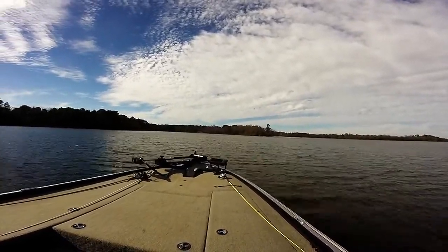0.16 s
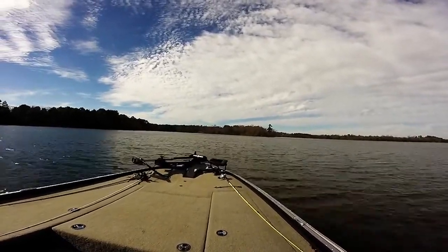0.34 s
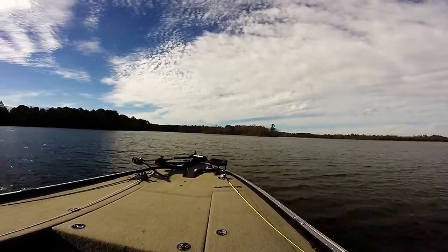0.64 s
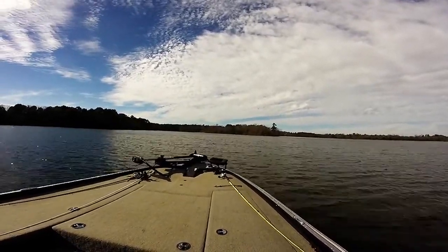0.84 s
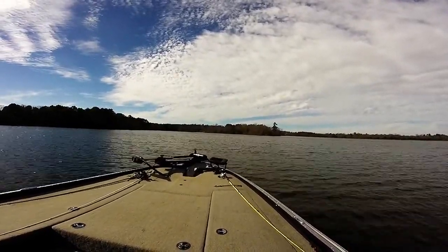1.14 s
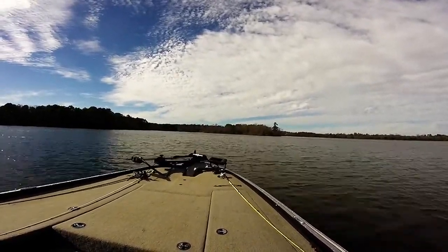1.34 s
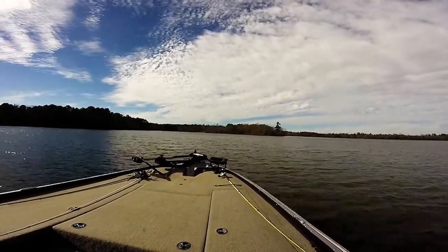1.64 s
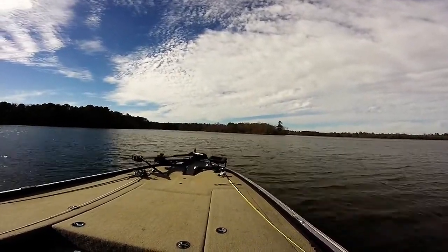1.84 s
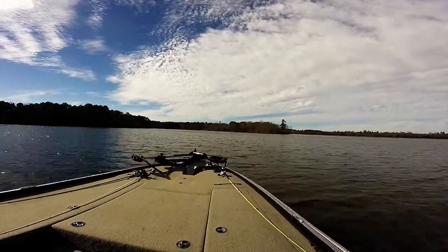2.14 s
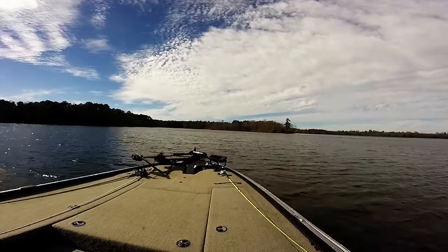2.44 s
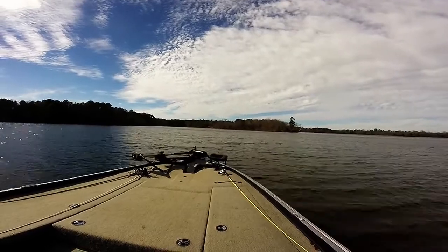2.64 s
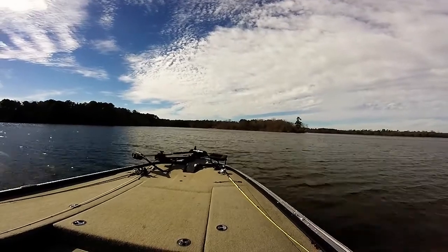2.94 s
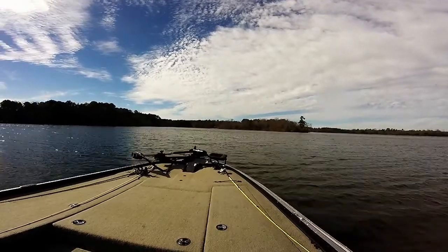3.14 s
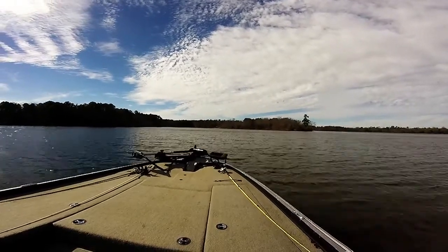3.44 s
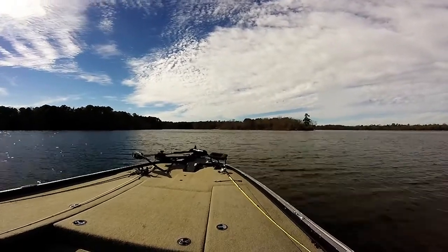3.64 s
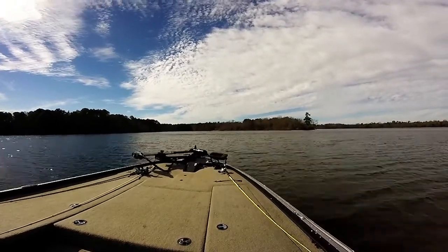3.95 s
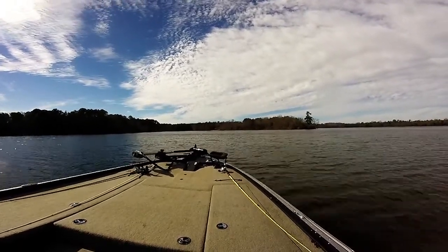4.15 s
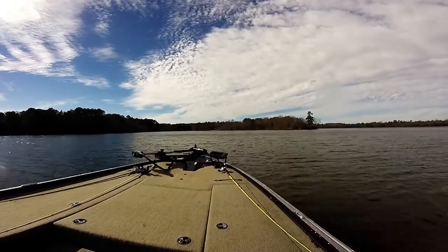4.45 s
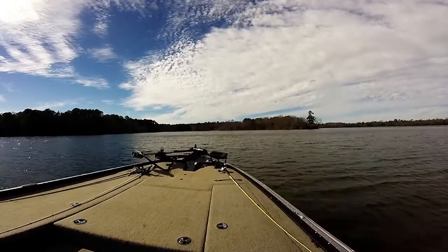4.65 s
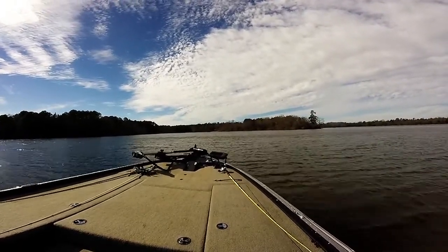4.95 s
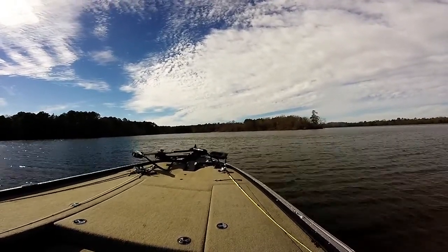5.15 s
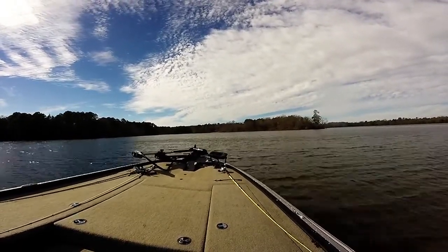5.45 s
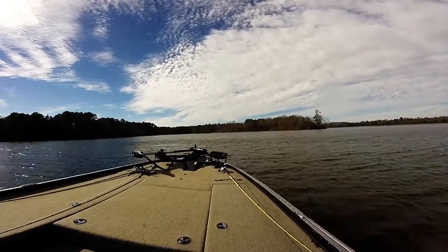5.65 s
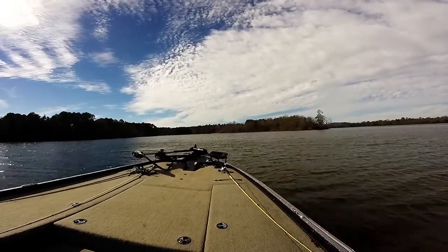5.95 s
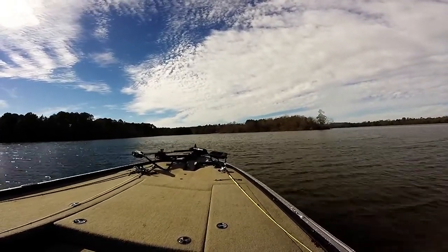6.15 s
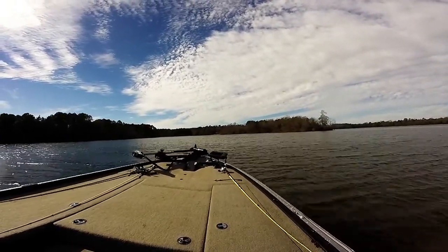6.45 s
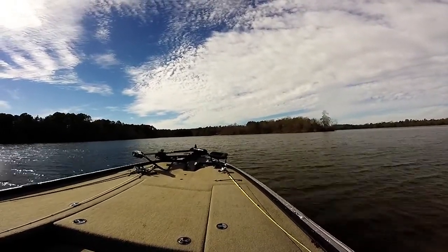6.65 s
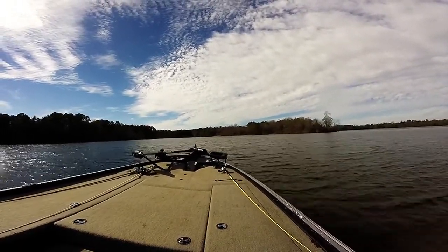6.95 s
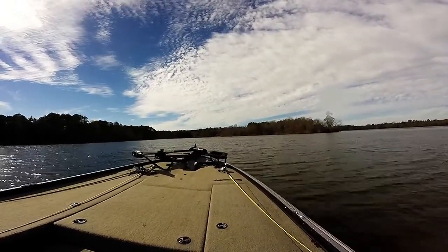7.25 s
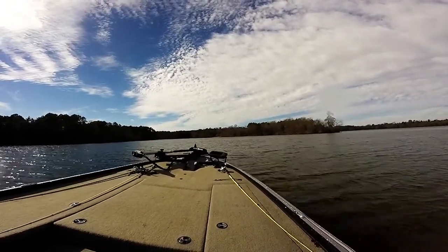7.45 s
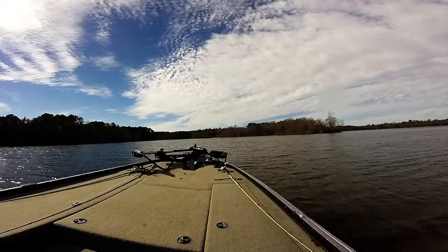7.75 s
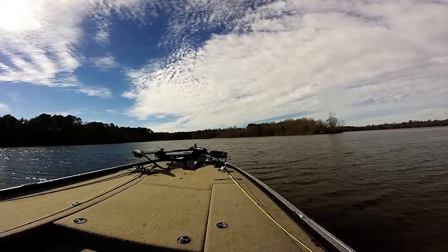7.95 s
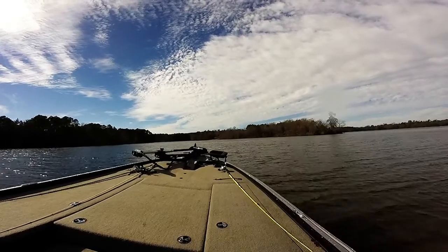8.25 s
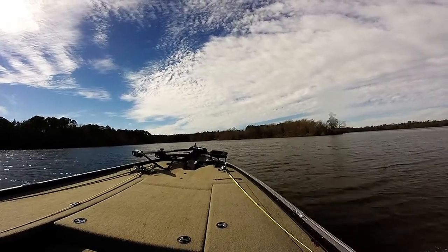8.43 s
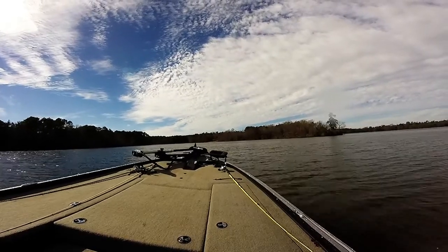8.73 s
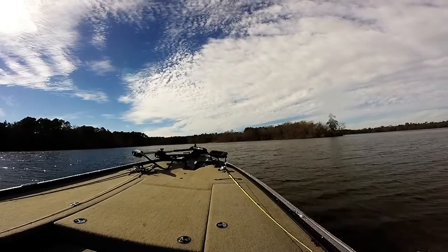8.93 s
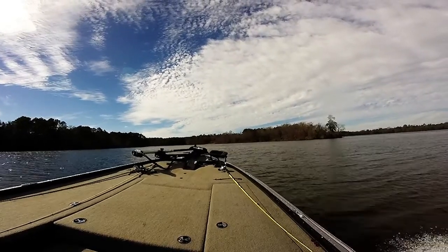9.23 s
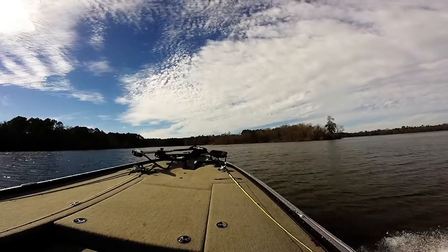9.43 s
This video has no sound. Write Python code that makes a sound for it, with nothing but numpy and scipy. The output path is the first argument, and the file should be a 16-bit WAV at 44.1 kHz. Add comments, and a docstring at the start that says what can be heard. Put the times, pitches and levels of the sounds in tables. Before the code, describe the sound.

An outboard drones steadily with rattling fittings, then throttles down through a hull boom into gusty wind rumble, wave thuds, rushing water and late splashes.

```python
"""A fishing boat runs across a lake, heard from a camera in a plastic housing on its deck.
At first the outboard drones at speed, made of sine tones, and buzzes and knocks loose fittings (noise).
Wind and chop rumble in gusts throughout, and water rushes along the sides: all of it shaped noise.
From about 1.2 s the throttle is eased and the tones sweep down through a boom of the hull.
Then waves boom, wavelets slap as short ringing tones, and near the end spray splashes beside the bow."""
import sys
import numpy as np
from scipy import signal
from scipy.fft import rfft, irfft, next_fast_len
from scipy.io import wavfile
from scipy.ndimage import uniform_filter1d, minimum_filter1d, map_coordinates

SR = 44100
rng = np.random.default_rng(int(sys.argv[2]) if len(sys.argv) > 2 else 0)


def wav_out(sig):
    """Save sig, one row per channel (or a flat mono array), as 16-bit PCM at SR to the path in sys.argv[1]."""
    wavfile.write(sys.argv[1], SR, np.round(np.clip(np.atleast_2d(sig).T, -1, 1) * 32767).astype(np.int16))


N = 422918  # length in samples

# Engine speed. Each row: time in seconds, crankshaft turns per second.
THROTTLE = [(0, 84.3), (.6, 84.4), (1.15, 84), (1.35, 80.5), (1.5, 72.5), (1.7, 67), (1.95, 58), (2.33, 50),
            (2.57, 48.4), (2.75, 46.5), (3.1, 44.7), (9.59, 44)]
# Engine loudness. Each row: time in seconds, gain in dB.
ENGINE_LOAD = [(0, -.5), (.6, 0), (1.2, -.5), (1.35, .5), (1.5, -1), (1.7, -8), (2.28, -11), (2.36, -1),
               (2.58, 0), (2.63, -9), (3.1, -9), (3.5, -15), (9.59, -18)]
# Engine tones. Each row: multiple of the crankshaft rate, level in dB before load and hull.
# The multiple 1.72 is the beat of the geared-down propeller blades.
ENGINE_TONES = [(1, -23.2), (1.72, -21.3), (2, -26), (3, -31.5), (4, -33.5), (5, -33)]
BOOM_HZ, BOOM_WIDTH_HZ, BOOM_DB = 85, 15, 12  # the hull's main resonance

# Resonances and dips of deck and mount. Each row: centre in Hz, width in Hz, gain in dB.
DECK = [(58.8, 7.7, 7), (68.4, 9, -10), (87.5, 6.1, 5.5), (118, 8.7, 5), (124.4, 4.2, -5.5),
        (140.5, 11.6, 3.5), (163.7, 10.2, 4.5), (175, 8.3, -5), (204.8, 11.8, 6), (440, 18, 5)]
# Resonances and dips of the plastic housing. Each row: centre in Hz, width in Hz, gain in dB.
HOUSING = [(641, 40, 4.5), (752, 118, 5), (1921, 167, 8.5), (2540, 570, 11), (3040, 108, -7.5),
           (3454, 420, 10.5), (3867, 133, -15), (3977, 360, 8.5), (4850, 350, 6), (5085, 145, -14),
           (6416, 930, 14.5), (8380, 330, 7.5), (10610, 690, 11)]

# Every spectrum below gives a shape only; its sound is scaled to an even level afterwards.
# Buzz of loose fittings. Each row: frequency in Hz, relative level in dB.
BUZZ_SPECTRUM = [(250, -42), (500, 3), (650, 5.5), (1000, 0), (1600, -4), (2100, 2), (2600, -11.5),
                 (4000, -17.5), (7000, -50), (14000, -96)]

# Strength of the wind. Each row: time in seconds, upper buffet in dB, low buffet in dB, before gains.
WIND = [(0, -24, -36), (1.2, -25, -34), (1.6, -21, -33), (1.9, -22, -28), (2.3, -17, -28), (2.65, -21, -29),
        (3.4, -18.5, -30), (4.0, -15.5, -26), (4.4, -18.5, -26.5), (5.1, -16.5, -23.5), (5.6, -16, -27),
        (6.2, -17.5, -32), (7.5, -13.5, -27.5), (7.85, -17.5, -36.5), (8.7, -16.5, -29.5),
        (9.1, -19.5, -34), (9.59, -20.5, -40)]
# The strongest gusts. Each row: time of the peak in seconds, rise in dB.
GUSTS = [(1.14, 5), (2.35, 2.5), (4.97, 5.5), (5.22, 3), (5.88, 5.5), (6.37, 2.5), (7.1, 1), (7.6, 1.5),
         (8.77, 2.5)]
GUST_S = .12  # length of a gust in seconds, at half its rise
HIGH_BUFFET_GAIN_DB = 0.86
HIGH_FLUTTER_DB, LOW_FLUTTER_DB = 1.62, 2.5  # depth of each layer's random flutter
# Low wind rumble. Each row: frequency in Hz, relative level in dB.
LOW_BUFFET_SPECTRUM = [(8, -17), (22, -10.5), (35, -2), (52, 0), (68, 6.5), (90, -7), (160, -42),
                       (400, -97)]
# Upper wind rumble. Each row: frequency in Hz, relative level in dB.
HIGH_BUFFET_SPECTRUM = [(40, -46), (75, -11), (100, -2.5), (150, 2), (200, -4), (260, -13), (305, -24),
                        (400, -34), (600, -48), (2000, -76)]

# The hull rides over waves. Each row: time of the peak in seconds, length in seconds, level in dB
# before the gain.
WAVES = [(1.977, 0.097, -12.5), (3.017, 0.18, -18), (3.26, 0.11, -13.5), (3.757, 0.24, -19.5),
         (4.277, 0.33, -15), (4.66, 0.19, -21), (4.947, 0.15, -13.5), (5.38, 0.16, -21),
         (5.664, 0.085, -12), (6.197, 0.18, -14.5), (6.623, 0.087, -15.5), (6.876, 0.14, -15.5),
         (7.555, 0.25, -13.5), (8.518, 0.24, -18.5), (9.22, 0.46, -18)]
WAVE_GAIN_DB = -3
CHOP_DB = 2.5  # steady boom, relative to the low buffet
# The hull's boom. Each row: frequency in Hz, relative level in dB.
BOOM_SPECTRUM = [(40, -38), (70, -18.5), (86, 3.5), (104, -16.5), (160, -50.5), (400, -94)]

# Strength of the bow wave. Each row: time in seconds, spray in dB, fizz in dB, before gains.
BOW_WAVE = [(0.0, -40, -45.5), (1.35, -39.5, -47), (2.2, -32.0, -39), (2.65, -36, -44), (3.1, -33.5, -40.5),
            (3.5, -34.5, -43), (3.9, -31.5, -36.5), (4.4, -34, -45), (5.3, -31, -41.5), (5.5, -37, -49),
            (5.85, -34.5, -43), (6.03, -36.5, -51), (6.6, -34.5, -42), (7.3, -33.5, -48.5),
            (7.7, -39, -58.5), (8.35, -37.5, -53), (8.9, -40.5, -54.5), (9.59, -44.5, -56.5)]
SPRAY_GAIN_DB, FIZZ_GAIN_DB = -.5, 0.07
WASH_DB, WASH_FOLLOWS = -38.5, 0.6  # mean of the wash's level curve; its dB per dB of fizz
# The bow wave curls into a hissing sheet as the boat settles. Each row: time in seconds, level in dB.
SHEET = [(0, -67), (2, -57), (3.4, -42), (4.2, -39.5), (5.3, -38.5), (6, -42), (6.6, -37.5), (7.2, -40.5),
         (7.6, -48), (8.3, -67), (9.59, -70)]
# Wash along the sides. Each row: frequency in Hz, relative level in dB.
WASH_SPECTRUM = [(150, 1), (400, 1.5), (700, -2.5), (1100, -0.5), (1700, -1.5), (2400, -5.5), (4000, -39),
                 (12000, -65)]
# Spray. Each row: frequency in Hz, relative level in dB.
SPRAY_SPECTRUM = [(800, -25), (1800, -14.5), (2600, 3), (3400, 1.5), (4300, -9), (5500, -24), (8000, -52),
                  (15000, -75)]
# Fizz of fine drops. Each row: frequency in Hz, relative level in dB.
FIZZ_SPECTRUM = [(2500, -21.5), (4500, 5.5), (5600, -0.5), (7000, 0.5), (9000, 0.5), (10000, -10),
                 (12000, -15), (15000, -38)]
# Hiss of the sheet. Each row: frequency in Hz, relative level in dB.
SHEET_SPECTRUM = [(2500, -17), (3600, 5.5), (4200, 7.5), (4900, 2.5), (5800, -3.5), (8000, -18),
                  (15000, -75)]

# Loose fittings knock. Each row: start in seconds, level in dB before the gain.
KNOCKS = [(0.177, -23), (0.381, -22), (0.395, -23), (0.9043, -23), (0.915, -20.5), (0.973, -22),
          (1.1444, -24), (1.2475, -22), (1.3003, -17), (1.945, -14), (1.965, -14)]
# A knock. Each row: frequency in Hz, relative level in dB.
KNOCK_SPECTRUM = [(300, -33), (650, -9), (1400, 2), (2100, 1), (2700, -0.5), (4000, -27), (7000, -53),
                  (14000, -90)]

# The hull meets wavelets. Each row: start in seconds, level in dB before the gain, pitch in Hz.
SLAPS = [(3.292, -6, 171.5), (5.075, -2.5, 163), (5.422, -1.5, 162.5), (5.951, -7, 153), (6.16, -12, 158),
         (7.886, -8.5, 202.5), (8.104, -2.5, 203)]

# Fine mist beside the bow. Each row: time in seconds, level in dB.
MIST = [(0, -93.5), (7.7, -88), (8.4, -57.5), (9.1, -56), (9.59, -54.5)]
# Mist. Each row: frequency in Hz, relative level in dB.
MIST_SPECTRUM = [(3000, -24), (5500, 4.5), (9000, -2.5), (11000, -9.5), (12300, -12), (13400, -10),
                 (15000, -21)]
# Sheets of water land. Each row: start in seconds, level in dB before the gain, pitch in Hz.
SPLASHES = [(7.72, -32, 3450), (7.88, -29, 3450), (8.0, -32, 3400), (8.24, -27.5, 3450),
            (8.33, -26.5, 2550), (8.46, -31, 2450), (8.72, -27.5, 2900), (8.86, -25.5, 3380),
            (9.22, -25.5, 2620), (9.40, -34, 2450), (9.49, -28, 2600)]
SPLASH_SKIRT_DB = 56  # fall of a splash's spectrum one octave from its pitch

TOP_HZ = 15140  # nothing is kept from here up


def amp(db):
    """Turn decibels into a gain."""
    return 10 ** (np.asarray(db) / 20)


def unit(x):
    """Scale to an average strength (rms) of 1."""
    return x / np.sqrt(np.mean(x ** 2) + 1e-20)


def along(points, hz):
    """Read a spectrum's level at any frequency, on a log frequency axis."""
    f, v = np.transpose(points)
    return np.interp(np.log(hz + 1), np.log(f + 1), v)


def bumps(modes, hz):
    """Add up the dB of bell-shaped peaks and dips; each width is taken at half its dB."""
    return sum(db * np.exp2(-(2 * (hz - centre) / width) ** 2) for centre, width, db in modes)


def curves(rows):
    """Draw one smooth-running line per column after the time, with a value for every sample."""
    s, *cols = np.transpose(rows)
    return [np.interp(np.arange(N) / SR, s, c) for c in cols]


def wobble(rate):
    """A smooth random curve through rate random points a second."""
    points = rng.standard_normal(int(N * rate / SR) + 4)
    return map_coordinates(points, [np.arange(N) * rate / SR])


def swell(s, length):
    """A smooth rise and fall from 0 to 1 around time s, length seconds wide at half height."""
    return np.exp2(-(2 * (np.arange(N) / SR - s) / length) ** 2)


def filtered(x, response):
    """Weigh each frequency of x by a response."""
    size = next_fast_len(N + SR // 2)  # spare room so that the end does not wrap round
    spectrum = rfft(x, size) * response(np.fft.rfftfreq(size, 1 / SR))
    return irfft(spectrum, size)[:N]


def coloured(x, spectrum, modes):
    """Give x a broad spectrum and a body's resonances, at rms 1."""
    return unit(filtered(x, lambda hz: amp(along(spectrum, hz) + bumps(modes, hz))))


def drops(rate, spread_db):
    """Random impacts, about rate a second, whose sizes vary by spread_db, at rms 1."""
    hit = rng.random(N) < rate / SR
    size_db = spread_db * np.clip(rng.standard_normal(N), -2, 2)
    return unit(hit * rng.standard_normal(N) * amp(size_db))


def bursts(events, spectrum, attack, t60):
    """Short puffs of noise coloured by the housing; each falls 60 dB in t60 seconds."""
    t = np.arange(N) / SR
    blows = np.zeros(N)
    for s, db in events:
        start = round(s * SR)
        age = t[:N - start]
        blows[start:] += amp(db - 60 * age / t60) * (1 - np.exp(-age / attack))
    return blows * coloured(rng.standard_normal(N), spectrum, HOUSING)


def outboard(speed, turns, shake):
    """Shaft and propeller tones swell as they cross the hull's boom; throttled back, firing is uneven."""
    level_db, = curves(ENGINE_LOAD)
    uneven = 1 + 2.5 * (1 - shake)
    drone = np.zeros(N)
    for multiple, db in ENGINE_TONES:
        hz = multiple * speed
        # octaves outside the band that the hull passes on, 62 to 255 Hz
        outside = np.log2(np.maximum(hz / 255, 1)) + np.log2(np.maximum(62 / hz, 1))
        hull_db = bumps([(BOOM_HZ, BOOM_WIDTH_HZ, BOOM_DB)], hz) - 42 * outside
        phase = 2 * np.pi * multiple * turns + .04 * uneven * wobble(25)
        tone_db = db + hull_db + .35 * uneven * wobble(18)
        drone += amp(tone_db) * np.sqrt(2) * np.sin(phase)
    return amp(level_db) * drone


def fittings(shake, turns):
    """Loose parts buzz once a turn, in fits, while the engine shakes them."""
    contact = np.exp(1.7 * np.cos(2 * np.pi * turns))  # strongest once every turn
    fits = amp(4.1 * wobble(14.1))
    buzz = coloured(contact * fits * rng.standard_normal(N), BUZZ_SPECTRUM, HOUSING)
    return amp(-40) * shake * buzz


def buffet(spectrum, evenness):
    """Turbulence makes the deck ring; evenness (0 to 1) tames its chance swells."""
    x = coloured(rng.standard_normal(N), spectrum, DECK)
    power = np.abs(uniform_filter1d(x ** 2, size=SR // 10)) + 1e-6  # averaged over 0.1 s
    return unit(x / power ** (np.clip(evenness, 0, 1) / 2))


def wind():
    """Wind rumbles in deck and mount; gusts push the upper buffet, and both layers flutter by chance."""
    high_db, low_db = curves(WIND)
    gust_db = sum(db * swell(s, GUST_S) for s, db in GUSTS)
    low_db = low_db + LOW_FLUTTER_DB * wobble(8)
    high_db = high_db + HIGH_BUFFET_GAIN_DB + gust_db + HIGH_FLUTTER_DB * wobble(11)
    low = amp(low_db) * buffet(LOW_BUFFET_SPECTRUM, evenness=0.55)
    high = amp(high_db) * buffet(HIGH_BUFFET_SPECTRUM, evenness=0.59)
    return low + high


def hull():
    """The hull booms faintly with the low rumble and swells as it rides over each wave."""
    _, low_db = curves(WIND)
    waves = sum(amp(db) * swell(s, length) for s, length, db in WAVES)
    strength = amp(low_db + CHOP_DB) + amp(WAVE_GAIN_DB) * waves
    return strength * buffet(BOOM_SPECTRUM, evenness=0.99)


def water(shake):
    """The bow wave washes, sprays, falls back as fine drops and hisses; wash follows fizz, less steeply."""
    spray_db, fizz_db = curves(BOW_WAVE)
    wash_db = WASH_DB + WASH_FOLLOWS * (fizz_db - fizz_db.mean())
    sheet_db, = curves(SHEET)
    surge_db = 0.27 * wobble(6) + 0.2 * wobble(19) + 0.66 * wobble(60)

    # each layer but the sheet mixes steady noise with separate drops
    wash_source = rng.standard_normal(N) + .5 * drops(rate=500, spread_db=2.5)
    spray_source = rng.standard_normal(N) + 0.6 * drops(rate=1100, spread_db=4)
    fizz_source = rng.standard_normal(N) + .5 * drops(rate=3200, spread_db=11.0)
    wash = coloured(wash_source, WASH_SPECTRUM, HOUSING)
    spray = coloured(spray_source, SPRAY_SPECTRUM, HOUSING)
    fizz = coloured(fizz_source, FIZZ_SPECTRUM, HOUSING)
    sheet = coloured(rng.standard_normal(N), SHEET_SPECTRUM, HOUSING)

    # thin spray arrives in separate spurts
    spurts_db = np.clip((-33 - spray_db) / 5.6, .5, 1.6) * wobble(18)
    spray_db = spray_db + SPRAY_GAIN_DB - 1.6 * shake + spurts_db
    near = amp(wash_db) * wash + amp(spray_db) * spray
    fine = amp(fizz_db + FIZZ_GAIN_DB) * fizz + amp(sheet_db) * sheet
    return amp(surge_db) * (near + fine)


def knocks():
    """Loose fittings strike harder now and then: very short bursts of noise."""
    return amp(-3) * bursts(KNOCKS, KNOCK_SPECTRUM, attack=.0007, t60=.026)


def slaps():
    """Wavelets thump the hull, which rings at one pitch and dies away quickly."""
    t = np.arange(SR // 4) / SR
    out = np.zeros(N + SR)
    for s, db, hz in SLAPS:
        attack = 1 - np.exp(-(t / 0.0048) ** 2)
        decay = amp(-60 * t / .13)  # 60 dB down in 0.13 s
        ring = np.sin(2 * np.pi * hz * t) * attack * decay
        out[round(s * SR):][:len(t)] += amp(db + 3.5) * ring
    return out[:N]


def side_spray():
    """Spray rises beside the bow: a fine mist of drops, and sheets that land, each with its own pitch."""
    mist_db, = curves(MIST)
    mist_drops = drops(rate=5000, spread_db=1)
    mist = amp(mist_db + wobble(30)) * coloured(mist_drops, MIST_SPECTRUM, [(5080, 130, -18)])
    landed = np.zeros(N)
    for s, db, hz in SPLASHES:
        band = [(hz / 2, -SPLASH_SKIRT_DB), (hz, 0), (hz * 2, -SPLASH_SKIRT_DB)]
        landed += bursts([(s, db)], band, attack=.02, t60=0.32)
    return mist + amp(-1.5) * landed


def scene():
    """Engine speed drives the drone and the shaking of the boat; all sounds are added up."""
    speed, = curves(THROTTLE)
    turns = np.cumsum(speed) / SR
    shake = np.clip((speed - 62) / 20, 0, 1)  # none up to 62 turns/s, full from 82
    boat = outboard(speed, turns, shake) + fittings(shake, turns) + hull() + knocks() + slaps()
    return (boat + wind() + water(shake) + side_spray())[None]


def record(dry):
    """The camera's limiter holds down the highest peaks; nothing is kept above its band limit."""
    needed = np.minimum(1, .84 / (np.abs(dry[0]) + 1e-9))
    held = minimum_filter1d(needed, size=SR // 50)
    gain = uniform_filter1d(held, size=SR // 50)
    soft_ends = signal.windows.tukey(N, .001)
    return filtered(dry[0] * gain * soft_ends, lambda hz: hz < TOP_HZ)[None]


dry = scene()
out = record(dry)
wav_out(out)
```